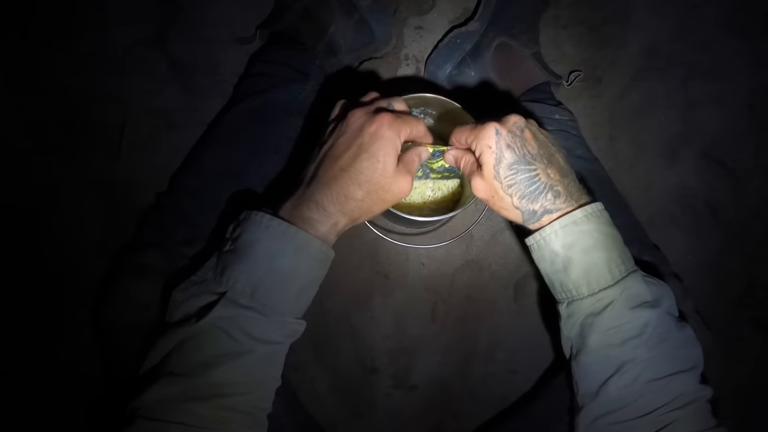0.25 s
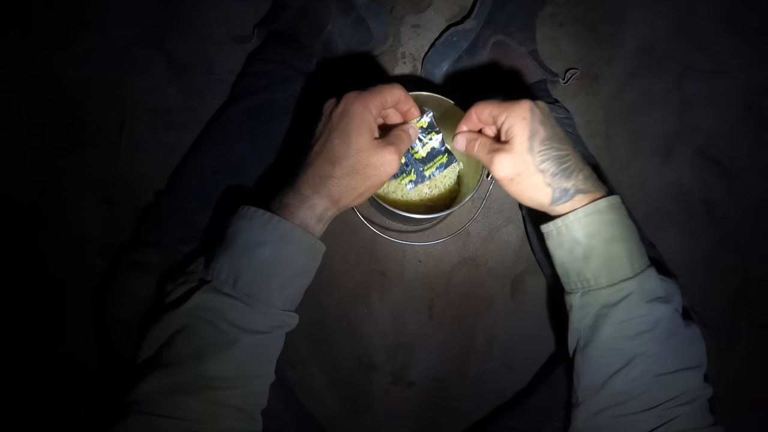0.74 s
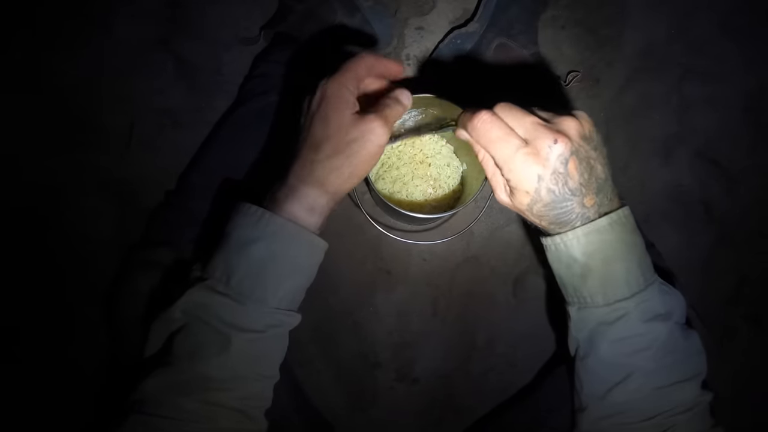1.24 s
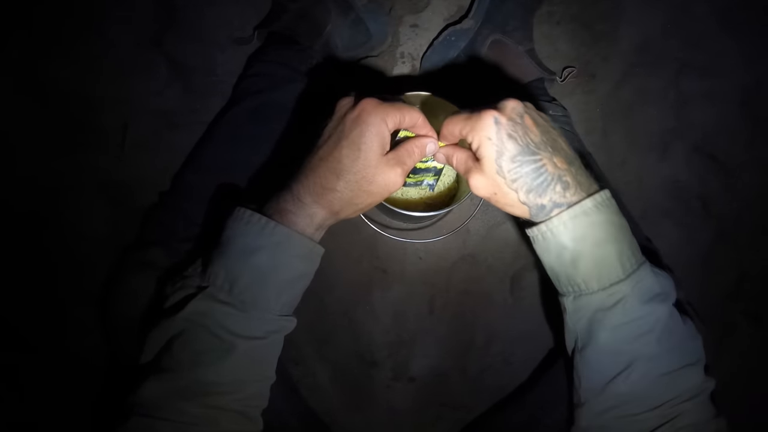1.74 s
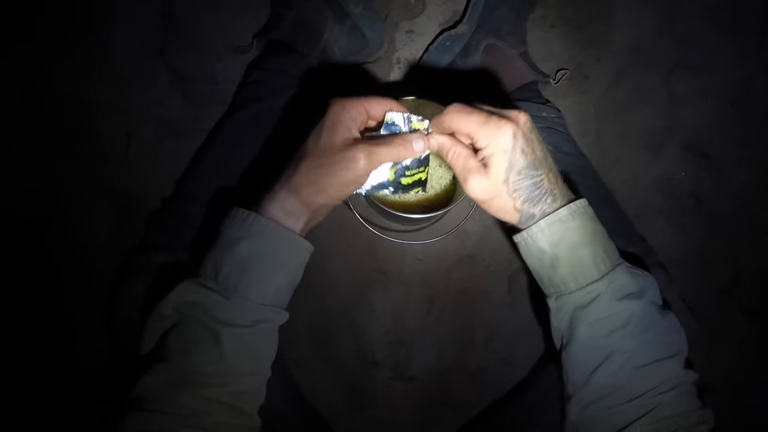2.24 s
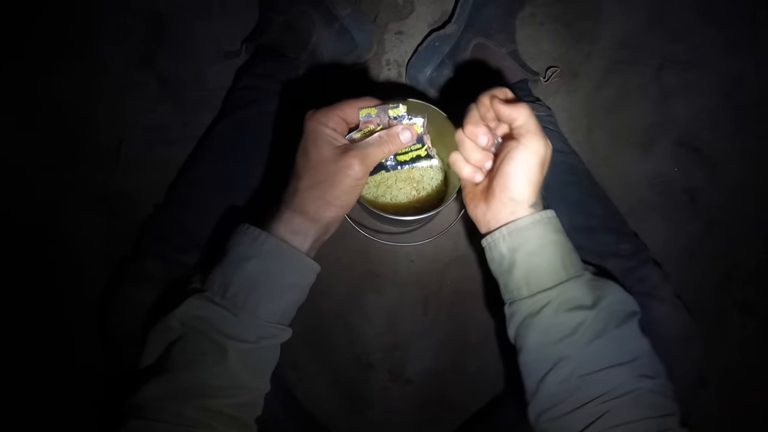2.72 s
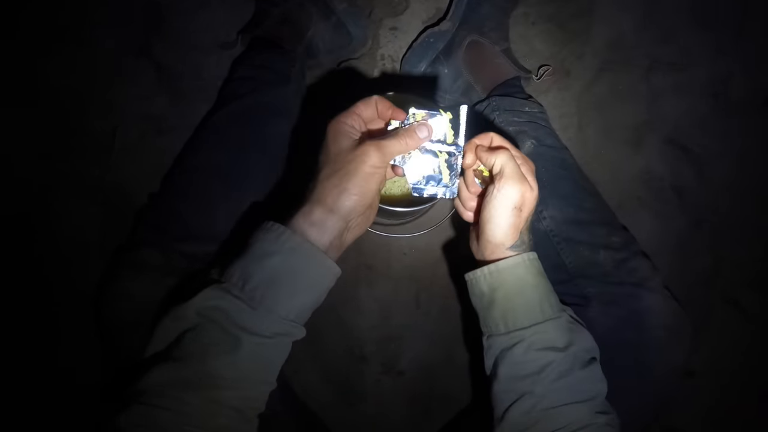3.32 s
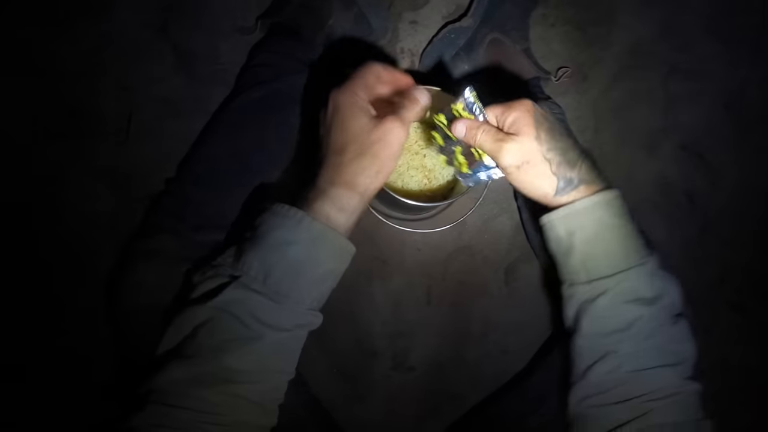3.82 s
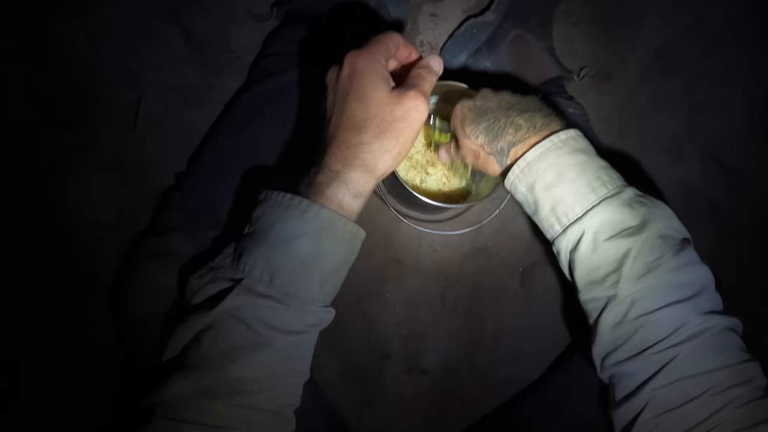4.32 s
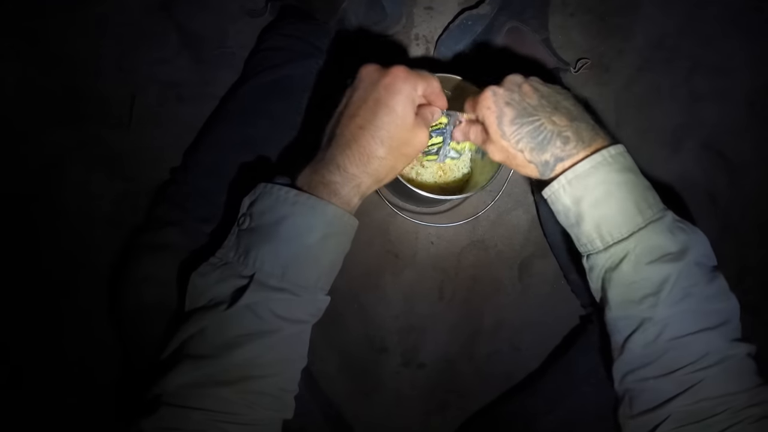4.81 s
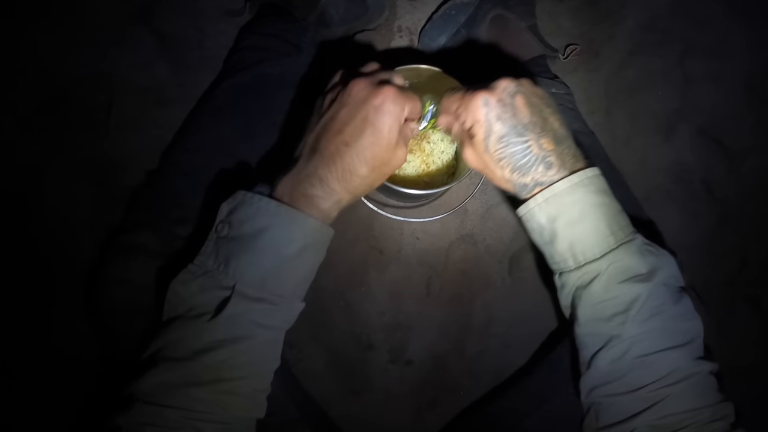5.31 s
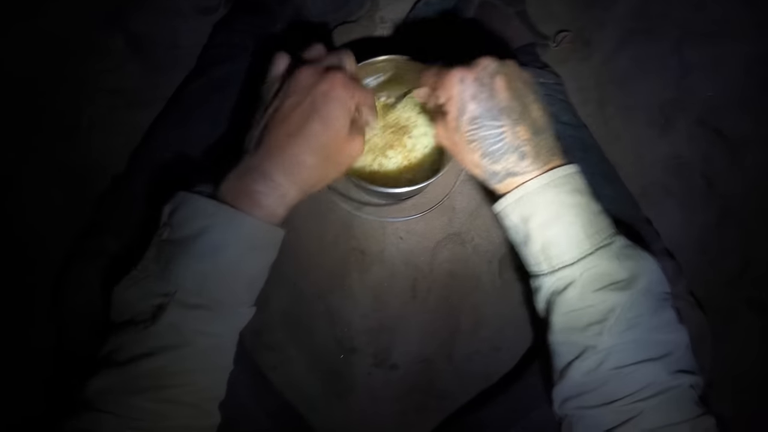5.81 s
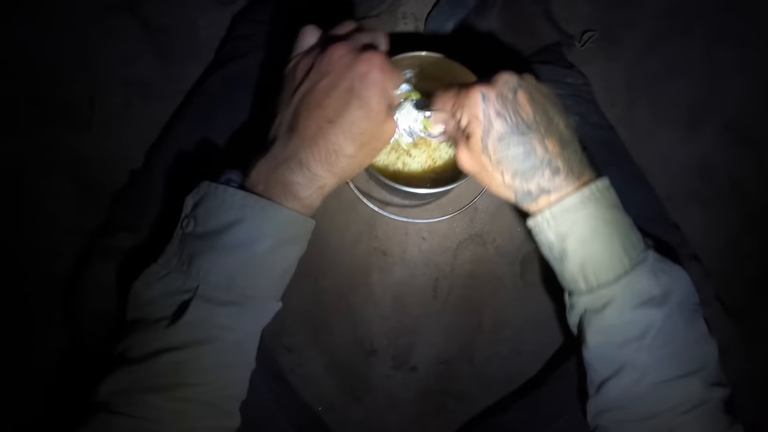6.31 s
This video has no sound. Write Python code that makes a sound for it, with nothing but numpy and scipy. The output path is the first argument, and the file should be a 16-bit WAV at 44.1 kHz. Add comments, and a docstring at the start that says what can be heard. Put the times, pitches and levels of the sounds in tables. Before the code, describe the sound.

Two hands work small foil sachets above a metal pot of noodles, heard close from a head-worn microphone. Sharp creases snap over fine crackle, become crowded with soft hollow pot thumps, then thin out to a quiet moment with a faint metallic rub. The crinkling returns and grows, loudest at the end. A faint low murmur and cloth rumble lie underneath, in a fairly dry, quiet place.

```python
"""Two hands crinkle, tear and empty foil sachets over a metal pot of noodles, close below a head-worn camera.
First, foil creases snap as short volleys of noise through a resonant patch, over a crackle of many tiny ones.
The creases crowd from 2 s, with decaying-sine thumps of the pot's air, and thin out near 4 s, where rubs ring
the wall's modes. From 4.8 s they return, loudest towards the end. Band-passed noise makes the faint low murmur,
the cloth rumbling on the camera throughout, and the knocks on its body near 0.9 s and, very faintly, 4.2 s."""
import sys
import numpy as np
from scipy import signal
from scipy.fft import rfft, irfft
from scipy.io import wavfile
from scipy.ndimage import uniform_filter1d

SR = 44100
rng = np.random.default_rng(int(sys.argv[2]) if len(sys.argv) > 2 else 0)


def unload_audio(sound):
    """Save the sound as a 16-bit wav file, at the path given as the first command line argument."""
    columns = np.transpose(np.atleast_2d(sound))
    # keep every value between -1 and 1, then stretch to whole-number steps
    steps = np.round(np.clip(columns, -1, 1) * 32767)
    wavfile.write(sys.argv[1], SR, steps.astype(np.int16))


N = 288855


def gain_of(db):
    """Amplitude factor for a level in dB."""
    return 10 ** (np.asarray(db) / 20)


def evened(x):
    """Scale each row to an RMS of 1."""
    return x / np.sqrt(np.mean(x ** 2, -1, keepdims=True) + 1e-20)


def read(points, hz):
    """Read a (frequency, value) table along a logarithmic frequency axis."""
    f, value = np.transpose(points)
    return np.interp(np.log(hz + 1), np.log(f + 1), value)


def curves(table):
    """Draw each column of a timed table as a line over the whole scene."""
    s, *columns = np.transpose(table)
    return [np.interp(np.arange(N) / SR, s, column) for column in columns]


def add(mix, s, sound):
    """Mix a sound in at a time in seconds, cut off at the end of the scene."""
    part = mix[..., max(round(s * SR), 0):][..., :sound.shape[-1]]
    part += sound[..., :part.shape[-1]]


def causal(db):
    """Minimum-phase spectrum for a gain in dB, by folding its cepstrum."""
    ceps = irfft(np.maximum(db, -100) * np.log(10) / 20)
    half = ceps.shape[-1] // 2
    ceps[..., 1:half] *= 2
    ceps[..., half + 1:] = 0
    return np.exp(rfft(ceps))


def band(x, lo_hz, hi_hz):
    """Band-pass filter."""
    return signal.sosfilt(signal.butter(2, [lo_hz, hi_hz], "bandpass", fs=SR, output="sos"), x)


def background():
    """A low murmur and the rumble and thudding of cloth: filtered noise, nearly alike in both microphones."""
    # low murmur: (time [s], level [dB])
    murmur_levels = [(0, -54), (.15, -58), (.9, -57), (1.4, -58.5), (1.95, -67), (2.15, -61.5), (3.4, -63),
                     (4.2, -63), (4.3, -63.5), (5.0, -62), (5.8, -55.5), (6.55, -55)]
    # cloth drags on the camera: (time [s], length [s], deep rumble [dB], thudding [dB])
    drags = [(0, 0.18, -67, -73), (0.187, 0.24, -63, -59), (0.834, .13, -55, -56), (1.0, 0.86, -83, -74),
             (2.08, .1, -72, -66), (4.24, .08, -55, -66), (4.26, 0.64, -55.5, -87), (5.2, 0.64, -70, -88),
             (5.734, 0.11, -61, -78), (6.096, 0.36, -61, -73)]
    rest_rumble_db, rest_thud_db = -76.5, -89  # cloth at rest
    murmur_db, = curves(murmur_levels)
    cloth = np.ones((2, N)) * gain_of([[rest_rumble_db], [rest_thud_db]])
    for s, length_s, *db in drags:
        swell = signal.windows.tukey(round(length_s * SR), 0.4)
        add(cloth, s, gain_of(db)[:, None] * swell)
    rumble_gain, thud_gain = cloth
    shared, own = rng.standard_normal((3, 1, N)), rng.standard_normal((3, 2, N))
    murmur, thud, rumble = shared + np.reshape([.2, .2, .35], (3, 1, 1)) * own
    return (gain_of(murmur_db) * evened(band(murmur, 122, 332))
            + thud_gain * evened(band(band(thud, 40, 133), 39, 67))
            + rumble_gain * evened(band(band(rumble, 9.5, 44), 6.3, 44)))


def jolts():
    """Dull knocks carried through the camera body: decaying low noise."""
    # knocks on the camera body: (time [s], peak [dB], t60 [s])
    knocks = [(0.884, -34, 0.14), (4.249, -65, .08)]
    out, t = np.zeros(N), np.arange(SR // 5) / SR
    for s, db, t60 in knocks:
        knock = band(rng.standard_normal(len(t)), 31, 410) * gain_of(-60 * t / t60)
        add(out, s, gain_of(db) * knock / abs(knock).max())
    return out


def surrounds(x, wet_db=-15):
    """A few early echoes, and a short sparse tail that differs left and right and dies sooner in the treble."""
    # early echoes off pot, noodles and ground: (delay [ms], level [dB])
    echoes = [(1.6, -48), (3.1, -28.5), (4.6, -34), (6.5, -30)]
    # decay of the tail: (frequency [Hz], t60 [s])
    decay = [(300, 0.28), (1500, 0.29), (4000, 0.12), (10000, 0.062)]
    size, slot = SR // 5, 20  # samples; each slot holds one reflection of random sign
    starts = np.arange(60, size - slot, slot)
    at = starts + rng.integers(0, slot, (2, len(starts)))
    taps = np.zeros((2, size))
    np.put_along_axis(taps, at, rng.choice([-1., 1.], at.shape), 1)
    hz, t, z = signal.stft(taps, SR, nperseg=128)
    fade = gain_of(-60 * t / read(decay, hz)[:, None])
    tail = signal.istft(z * fade, SR, nperseg=128)[1][:, :size]
    tail *= gain_of(wet_db) / np.linalg.norm(tail[0])
    tail[:, 0] = 1  # the direct sound
    for ms, db in echoes:
        tail[:, round(ms * SR / 1000)] += gain_of(db)
    return signal.fftconvolve(x, tail, axes=1)[:, :N]


def pot_air():
    """Soft thumps of the air inside the pot: decaying sines under a gentle attack."""
    # pushes on the air: (time [s], level of the main tone [dB] before its rise and decay, frequency [Hz])
    thumps = [(0.241, -51, 225), (0.695, -43, 183), (0.881, -47, 280), (1.303, -42, 220), (2.047, -51, 328),
              (2.114, -35, 177), (2.393, -40, 223), (2.503, -53, 301), (2.993, -46, 183), (3.044, -41, 188),
              (3.796, -41, 410), (4.254, -48, 146), (4.804, -44, 204), (4.886, -47, 376), (5.061, -48, 226),
              (5.179, -47, 152), (5.292, -37, 220), (5.381, -43, 220), (5.503, -38, 225), (5.613, -44, 180),
              (5.725, -37, 203), (5.803, -33, 207), (5.865, -43, 214), (6.266, -36, 222), (6.341, -40, 376),
              (6.454, -36, 261)]
    t60_at_40_s, longer_per_db, rise_s = 0.1, 1.06, 0.0033  # t60 of a -40 dB push; harder ones last longer
    out, t = np.zeros(N), np.arange(SR // 3) / SR
    rise = 1 - np.exp(-(t / rise_s) ** 2)
    # higher air modes: (frequency [Hz], level against the main tone [dB])
    overtones = sum(gain_of(g - 60 * t / 0.094) * np.sin(2 * np.pi * f * t) for f, g in [(550, 0.5), (660, -12)])
    for s, db, hz in thumps:
        t60 = t60_at_40_s * longer_per_db ** (db + 40)
        add(out, s, gain_of(db - 60 * t / t60) * rise * (np.sin(2 * np.pi * hz * t) + overtones))
    return out


def pot_wall():
    """The pot's wall set ringing by a short rub: spiky noise drives clusters of decaying modes."""
    # pot wall modes: (frequency [Hz], relative level [dB], t60 [s])
    modes = [(1350, -5.5, 0.6), (2130, 6.5, 0.45), (2760, -21, .07), (3230, 13, 0.18), (4940, 22, 0.038),
             (5500, -3, 0.025)]
    # sachet drags on the wall: (time [s], length of the rub [ms], level of rub and ring [dB])
    rubs = [(4.15, 180, -53.5), (4.398, 35, -54)]
    out, t = np.zeros(N), np.arange(SR // 3) / SR
    wall = np.zeros(len(t))
    for f, g, t60 in modes:
        for split in 1 + .032 * rng.standard_normal(9):  # the dented wall splits each mode into a cluster
            wall += gain_of(g - 60 * t / t60) * np.sin(2 * np.pi * f * split * t)
    for s, ms, db in rubs:
        rub = rng.standard_normal(round(ms * SR / 1000)) ** 3
        add(out, s, gain_of(db) * evened(np.convolve(rub, wall)))
    return out


def creases(pitch_hz, low_db, top_db, ms, peak_db, lumps_db):
    """One left-right pair a crease: a quick volley of tiny buckles rings a patch of foil."""
    # foil heard above the pot: (frequency [Hz], relative level [dB])
    foil = [(180, -27.5), (300, -14.5), (469, -12), (535, -4), (757, -16), (1040, -4), (1570, -7.5),
            (1910, -2.5), (2290, -4.5), (2750, -1.5), (3090, -4), (5890, 0), (9990, -5.5), (13200, -21),
            (15600, -29.5)]
    # hollow of the sachet and hands: (frequency [Hz], width [Hz], boost [dB])
    pouch = [(1937, 84, 2.5), (2120, 64, 3), (4550, 400, 1.5), (8260, 1500, 2.5)]
    t, hz = np.arange(1024) / SR, np.fft.rfftfreq(1024, 1 / SR)
    pitch_hz, low_db, top_db, ms = (np.reshape(c, (-1, 1)) for c in (pitch_hz, low_db, top_db, ms))
    count = len(ms)

    attack = 1 - np.exp(-t / 0.000067)
    decay = np.exp(-(1000 * t / np.maximum(ms, .1)) ** 1.38)
    volley = rng.standard_normal((count, len(t))) * decay * attack

    octaves = np.log2((hz + 1) / pitch_hz)
    db = read(foil, hz) + peak_db * np.exp(-(octaves / 0.24) ** 2)
    # a patch radiates less away from its pitch
    db = db - 3.43 * np.clip(-octaves, 0, 3) - 2.8 * np.maximum(octaves, 0)
    db = db + low_db / (1 + (hz / 1600) ** 4) + top_db / (1 + (5500 / (hz + 1)) ** 4)
    # each patch has its own modes
    lumps = uniform_filter1d(rng.standard_normal((count, len(hz))), size=12)
    db = db + lumps_db * evened(lumps)
    db = db + sum(g / (1 + (2 * (hz - f) / width) ** 2) for f, width, g in pouch)

    # partly flatten the wide-band buckles, so that the foil gives the colour
    spectrum = rfft(volley)
    spectrum /= uniform_filter1d(abs(spectrum), size=16) ** 0.63
    # each crease sits a little left or right, in level and, independently, in time
    lean_db = 0.89 * rng.standard_normal((count, 1))
    lead_samples = 0.094 * rng.standard_normal((count, 1))
    lean = gain_of(lean_db) * np.exp(2j * np.pi * hz * lead_samples / SR)
    late = np.exp(-2j * np.pi * hz * 4 / SR)  # 4 samples of delay
    patch = spectrum * causal(db) * late
    return irfft(patch[:, None] * np.stack([lean, 1 / lean], axis=1))


def crackle(per_s=2200, spread_db=3.5):
    """Many small creases at random, a few much larger than the rest, flaring as folds give way."""
    # how hard the fingers work the foil: (time [s], level before colour [dB])
    work = [(0.0, -46), (0.58, -56.5), (0.77, -50), (0.91, -63), (1.17, -45), (1.29, -49.5), (1.62, -59),
            (1.95, -50.5), (2.11, -42.5), (2.26, -48.5), (2.57, -45.5), (2.79, -49.5), (3.26, -50.5),
            (3.43, -56.5), (3.68, -59), (3.89, -48), (4.16, -49), (4.29, -64), (4.52, -62), (4.8, -60.5),
            (4.98, -50), (5.82, -37.5), (5.97, -38), (6.22, -42.5), (6.38, -47.5), (6.55, -22.5)]
    # colour as the sachets move over the pot: (time [s], low end [dB], top end [dB])
    colour = [(0, 10, -6), (1.0, 9.5, -5.5), (2.1, 5.5, -6), (2.3, -3.5, -6.5), (2.95, 6.5, -6.5),
              (3.4, 0.5, -8.5), (4.0, 6.5, -2.5), (4.4, 3.5, -2), (5.0, 6.5, -5), (5.8, 6.5, -2),
              (6.55, 0.5, -2)]
    # short level changes, nearly all dips as the fingers let go: (time [s], length [ms], change [dB])
    pauses = [(.98, 200, -5.5), (1.57, 79, 0.5), (2.188, 81, -13), (3.1, 45, -3.5), (5.35, 25, -3.5),
              (5.459, 20, -2.5), (5.736, 21.5, -12), (5.82, 19, -15), (6.063, 74, -8.5), (6.47, 27, -21)]
    # a fold gives way and the crackle flares: (time [s], length before stretching [ms], added level [dB])
    flurries = [(0.115, 22, -44), (0.156, 20, -47), (0.233, 12, -35.5), (0.276, 21, -47), (0.36, 14, -41),
                (0.41, 7.7, -39.5), (0.433, 19, -39), (0.461, 31, -48.5), (0.56, 7.8, -39.5),
                (0.641, 6.7, -39), (0.659, 12, -48), (0.739, 50, -41), (0.817, 14, -66), (0.884, 9.6, -51),
                (0.959, 10, -47), (1.1, 16, -48.5), (1.23, 19, -39.5), (1.288, 53, -39), (1.435, 38, -42.5),
                (1.645, 44, -44.5), (1.726, 17, -49), (1.771, 26, -48.5), (1.812, 12, -46),
                (1.842, 26, -38), (1.954, 16.6, -40), (2.015, 51, -48), (2.113, 2.9, -37), (2.265, 67, -41),
                (2.338, 16, -39.5), (2.388, 76, -36), (2.486, 23, -33.5), (2.586, 12, -41),
                (2.621, 66, -41.5), (2.7, 54, -40), (2.83, 20, -49), (2.889, 15, -40.5), (2.959, 64, -37),
                (3.052, 34, -46), (3.154, 12, -60), (3.206, 16, -57), (3.276, 10, -41), (3.323, 15, -40),
                (3.35, 53, -46), (3.519, 10, -61), (3.561, 16, -68), (3.63, 15, -59), (3.791, 42, -34),
                (3.895, 13, -45), (3.966, 71, -44.5), (4.152, 73, -43.5), (4.245, 25, -43),
                (4.288, 45, -41.5), (4.353, 22, -51), (4.401, 16.2, -40), (4.565, 24, -52), (4.76, 12, -56),
                (4.808, 17.5, -29), (4.839, 55, -37), (4.942, 16, -39), (5.014, 24, -38.5),
                (5.066, 34, -35), (5.14, 17, -47), (5.184, 39, -37), (5.234, 8.7, -38.5),
                (5.255, 25, -41.5), (5.289, 29, -30.5), (5.376, 28, -34.5), (5.329, 20, -33),
                (5.439, 14, -39), (5.523, 13, -35), (5.499, 17.7, -25.5), (5.568, 32, -34.5),
                (5.608, 36, -31.5), (5.692, 7.1, -29), (5.721, 14.4, -28), (5.76, 9.8, -39),
                (5.782, 36.4, -30.5), (5.857, 24, -26), (5.898, 50, -30), (5.969, 14, -34.5),
                (6.025, 9.6, -27.5), (6.103, 17, -44.5), (6.174, 54, -28.5), (6.214, 33, -30),
                (6.262, 25.7, -24), (6.327, 140, -29), (6.455, 9.1, -22)]
    (level_db,), (low_db, top_db) = curves(work), curves(colour)
    for s, ms, db in pauses:
        add(level_db, s, db * signal.windows.tukey(round(ms * SR / 1000), 0.3))
    power = gain_of(level_db) ** 2
    for s, ms, db in flurries:
        # stretched, and begun early, to make room for the soft edges
        swell = signal.windows.tukey(round(1.53 * ms * SR / 1000), 0.68)
        add(power, s - 0.32 * ms / 1000, gain_of(db) ** 2 * swell)

    count = 32  # different crease sounds to draw from
    shapes = creases(np.geomspace(1500, 8000, count), np.zeros(count), np.zeros(count),
                     rng.uniform(0.11, 1.0, count), peak_db=4.0, lumps_db=3)
    shapes /= np.std(shapes, axis=(1, 2), keepdims=True)
    happens = rng.random(N) < per_s / SR
    size = gain_of(spread_db * np.minimum(rng.exponential(1, N), 4)) * happens
    size = evened(size) * np.sqrt(power / shapes.shape[-1])
    which, out = rng.integers(0, count, N), np.zeros((2, N))
    for k, shape in enumerate(shapes):
        out += signal.oaconvolve((size * (which == k))[None], shape, axes=1)[:, :N]

    low, top = band(out, 89, 1516), band(out, 3280, 15500)
    return out + (gain_of(low_db) - 1) * low + (gain_of(top_db) - 1) * top


def snaps():
    """The loud creases, one by one: smaller, brighter patches tend to let go quicker."""
    # loudest creases: (time [s], dry peak of the left-right mean [dB], pitch of the foil patch [Hz],
    # low end [dB], top end [dB])
    loud_creases = [(0.1311, -23.5, 3919.0, -1.2, 15), (0.2142, -23.5, 5500, 22, 3.5),
                    (0.2858, -26, 5426.0, 20.5, -5), (0.3554, -26, 5512.0, 6, 3),
                    (0.3634, -22, 5200, 7, -4), (0.387, -34, 1937.0, 11, -5), (0.4084, -24, 2500, -6, 8),
                    (0.4656, -24, 6158.0, 5.7, -12), (0.5068, -27.5, 1230, 9.5, 5),
                    (0.546, -31.5, 3703.0, 18, -1), (0.5574, -30, 5211.0, 5.7, 5.9),
                    (0.561, -20.5, 3789.0, 2, 7), (0.5899, -23.5, 1910, -6, 3), (0.61, -25, 8450, 26, 10),
                    (0.646, -41, 2340, 4.3, -11), (0.6618, -28.5, 1894.0, -2, -9),
                    (0.6727, -27, 5470, -3, -9), (0.7147, -19, 4565.0, 19, 5),
                    (0.7709, -22.4, 5857.0, -4, -2), (0.8264, -30, 1760, 1, -5.5),
                    (0.9042, -28, 4720, 12, -11), (0.9298, -28, 3630, 0, -19),
                    (0.934, -17.5, 1720, 0.5, -7.5), (0.9613, -27, 1720, 7, -14),
                    (0.9675, -36.5, 1780, -3, -4), (1.1288, -28.5, 5540, 4, -4), (1.2139, -29, 3080, 7, -4),
                    (1.2314, -26, 4177.0, -0.4, 13), (1.2392, -20.9, 4380, 13, 6),
                    (1.2895, -18.5, 7900, 5.3, -9), (1.3052, -22.5, 2120, -5, 1.5),
                    (1.3305, -27, 1464.0, 11, 13), (1.4512, -26.0, 4700, 4, -2),
                    (1.5223, -31, 4050, -1.1, -11), (1.5724, -33, 5900, -3, -20),
                    (1.6471, -28, 3130, 5.2, -10), (1.6506, -23.5, 2110.0, -10, -1),
                    (1.6966, -29, 4435.0, 17, 1), (1.7276, -33.9, 4737.0, 7, -2.6),
                    (1.7371, -29.5, 5250, -2.8, -6), (1.7766, -31, 4694.0, 13, -9),
                    (1.7802, -26, 4600, 10, -13), (1.8116, -23.5, 2260, 1, -2.7),
                    (1.8335, -24, 4900, 6, -3), (1.8509, -23, 2170, 16, 4), (1.855, -15.5, 8700, -10, -3),
                    (1.93, -33.5, 2239.0, -8.4, -6.7), (1.9583, -31, 4620, -3, -3),
                    (2.021, -22.5, 5469.0, 7, 5), (2.03, -23.5, 4823.0, 7.5, -5.5),
                    (2.0606, -21, 5500, 8, -6), (2.0957, -22.4, 2600, 13.5, 0), (2.1141, -18, 1960, 7, -10),
                    (2.1177, -17.5, 1808.0, 16, 7), (2.1419, -22.4, 2067.0, -1.2, -5),
                    (2.176, -32, 4220.0, 11, -20), (2.25, -35, 6373.0, 2.9, 8.1),
                    (2.259, -27.9, 5426.0, -5, 9), (2.2699, -20, 2720, 7, 6), (2.2875, -26.5, 2500, 9, 8),
                    (2.3163, -24.5, 2000, 0, -12), (2.357, -22.5, 1894.0, 1, -8),
                    (2.3927, -17.5, 1830, 6, -3), (2.3969, -17, 5986.0, -6, 1),
                    (2.4249, -16, 2150, 7.5, -6), (2.459, -14.5, 1990, -8, -16),
                    (2.4674, -29, 4306.0, 6, -16), (2.4823, -24, 8182.0, -1, 7.9),
                    (2.4878, -20.5, 4392.0, -14, 7), (2.5034, -15.5, 4370, 7, -10),
                    (2.5084, -25, 2799.0, 10, -3.6), (2.5342, -22, 2880, -9, -11),
                    (2.5493, -24.5, 4000, 3, 1.3), (2.5965, -27, 2239.0, -2, 13),
                    (2.6076, -31, 5254.0, -12, 12), (2.629, -20.5, 5640, -6, 7),
                    (2.6509, -14, 2000, -25, -8.5), (2.6577, -24.2, 2799.0, -3, 7),
                    (2.664, -25.7, 4521.0, -13, 0), (2.6769, -24, 4091.0, -2, 0),
                    (2.7135, -26, 4240, 3.5, 1), (2.747, -21.5, 1300, 11.5, -3),
                    (2.8309, -15.5, 2370, -8, -7.5), (2.8932, -33, 2799.0, -2, 9),
                    (2.8994, -21, 4470, 6, 9), (2.957, -22.5, 5900.0, 18, 8),
                    (2.9678, -14.5, 5943.0, 7.5, -14), (2.9889, -15, 5770.0, -1.8, 0),
                    (3.0534, -25, 4048.0, -9, -12), (3.083, -31.5, 2740, 3.9, -14),
                    (3.0949, -34, 4600, 15, -9), (3.1609, -36.5, 2153.0, -5.6, -15),
                    (3.1704, -24.5, 4600, -19, -6), (3.211, -28.7, 4240, -13, 1),
                    (3.2166, -24.5, 2368.0, -29, -5), (3.2852, -14.5, 3120, -24, -6),
                    (3.3289, -16.5, 4909.0, 11, 0), (3.3498, -21.5, 3150, -25, -18),
                    (3.3574, -20.5, 3240, -15, -14.5), (3.3767, -22.5, 4450, 6.5, -4),
                    (3.3973, -25, 5986.0, 11, -7), (3.4212, -29.5, 6040, 9, -13),
                    (3.4587, -34.5, 4940, 1.3, -7), (3.5217, -40, 4349.0, 10, -7),
                    (3.5653, -40, 2350, -3.9, -11.4), (3.624, -32.9, 4478.0, -3, -7),
                    (3.633, -24, 2110.0, 2, 3), (3.659, -29.5, 2713.0, 8, 3), (3.672, -39, 2670.0, 0, 1),
                    (3.7427, -37, 4565.0, 3.8, -10.5), (3.7554, -21, 4100, -30, -43),
                    (3.7726, -23, 4177.0, -6, -17), (3.8074, -12, 4770, 12, -6), (3.829, -21, 4600, -7, -1),
                    (3.8473, -22.5, 1140, 7, -3), (3.8585, -21, 4600, -13, -4.3),
                    (3.8734, -25.5, 4048.0, 5.6, -9), (3.9048, -23.5, 5600, 18, -4),
                    (4.152, -28.5, 4694.0, 2, -14), (4.4615, -30.5, 4048.0, -22, -12),
                    (4.7593, -35.7, 4005.0, -5.0, -21), (4.7654, -30, 2067.0, -16, -20),
                    (4.8204, -18.5, 1890, 13, 13), (4.847, -17, 1790, -2, -3), (4.856, -21, 4700, 1, -5.3),
                    (4.8659, -20, 6115.0, 3.3, 23), (4.9293, -33, 4823.0, -1, -2.8),
                    (4.9493, -22.5, 1840, -7, -12), (4.9856, -24, 6287.0, 7, -2),
                    (4.992, -23, 4650, -9.5, -2.9), (5.0452, -22.5, 1960, 9, 2.9),
                    (5.091, -24, 2971.0, 1, 3), (5.1474, -26.5, 5297.0, 3.8, 22),
                    (5.231, -23, 6158.0, 7.7, 34), (5.417, -25.0, 1210, 2, -5),
                    (5.438, -18, 6287.0, -3, 0.2), (5.4438, -16.5, 4700, 12, -2),
                    (5.4556, -18.5, 5060, -1, -7.2), (5.5473, -25, 1937.0, 4, 2),
                    (5.573, -18.5, 1880, 16.5, 14.5), (5.5878, -17, 5512.0, -3, 3),
                    (5.615, -10.5, 5684.0, 6.1, -8), (5.621, -12.5, 5630, -1, 0),
                    (5.6384, -14.5, 5124.0, -1, 3.3), (5.6684, -23, 3789.0, -7, -11),
                    (5.6796, -17, 8441.0, -6, 17), (5.699, -19, 1981.0, 4, -6), (5.72, -20, 5081.0, -2, 15),
                    (5.7604, -19.5, 6072.0, 11, 16), (5.7804, -18.5, 5600, 10, 9),
                    (5.8108, -11.5, 8850, 15, -2), (5.846, -18.4, 4435.0, 0.4, 8),
                    (5.868, -15.3, 4392.0, 1.7, -8), (5.8891, -6.5, 6200, 12, 0),
                    (5.9185, -18.3, 9500, 0, 14), (5.9394, -24, 4400, 7, 11), (5.9838, -16, 6700, 11, -1),
                    (6.0044, -11, 3830, 0, 2.7), (6.0225, -14, 7950, -3, -3),
                    (6.0347, -16.5, 3200, -14, -9), (6.0474, -37, 2713.0, 4, -4.2),
                    (6.06, -20, 5600, -11, 0), (6.0988, -26, 5469.0, 10, -12),
                    (6.1349, -23.5, 5297.0, -11, -16), (6.1846, -10.5, 5641.0, -10, -6),
                    (6.222, -14, 2842.0, -13, -9), (6.2536, -17.5, 1920, 8, 4),
                    (6.2598, -16.5, 1860, -3, -1.7), (6.2642, -12.5, 1800, 2, -5),
                    (6.3113, -11.5, 6115.0, -5, -1), (6.316, -12, 6029.0, -11, 1),
                    (6.3289, -14.5, 3380, 2, -10), (6.3341, -13.3, 4900, -6.0, -10),
                    (6.3394, -9, 5641.0, -13, -4), (6.3512, -11.5, 6000, 11, -7),
                    (6.3571, -7, 5430, 8, -13), (6.3654, -7.5, 2610, -2, -4), (6.3785, -8, 4900, -12, -7),
                    (6.3821, -12.5, 3130, 0, -14), (6.3916, -17, 4263.0, 31, 9),
                    (6.4125, -23, 7967.0, 2.6, -2), (6.4567, -11.3, 7000, 30.5, 0),
                    (6.4645, -15, 4000, -6, -5.1), (6.5087, -14.5, 4263.0, -2.9, -1.8),
                    (6.5473, -13, 6140, -0.7, 12.8)]
    ms_at_4khz, shorter_per_octave, length_spread = 0.82, 0.62, 0.88  # spread in natural-log units
    s, db, hz, low_db, top_db = np.transpose(loud_creases)
    ms = ms_at_4khz * shorter_per_octave ** np.log2(hz / 4000)
    ms = ms * np.exp(length_spread * rng.standard_normal(len(s)))
    sound = creases(hz, low_db, top_db, ms, peak_db=6.0, lumps_db=2.8)
    peak = abs(sound.mean(1)).max(1)
    sound = sound * (gain_of(db) / peak)[:, None, None]
    out = np.zeros((2, N))
    for at, crease in zip(s, sound):
        add(out, at, crease)
    return out


def scene():
    """Foil and pot sound in their surroundings; murmur, cloth and knocks stay dry."""
    foil_and_pot = snaps() + crackle() + pot_air() + pot_wall()
    return surrounds(foil_and_pot) + background() + jolts()


def record(dry):
    """The two microphone ports differ a little in level and phase; then the top is cut off."""
    # level between the ports: (frequency [Hz], left minus right [dB])
    balance = [(60, -1.0), (150, -1.6), (380, -0.84), (950, -1.2), (2380, -1.6), (5980, -1.4),
               (15000, 0.015)]
    # phase between the ports: (frequency [Hz], lead of the left [rad])
    lead = [(0, -0.54), (1550, -0.071), (1890, -0.28), (3270, -0.83), (5770, -0.41), (6980, -0.94),
            (7670, 0.15), (10200, 0.41), (13200, 1), (15300, 1)]
    edge_hz = 15780
    hz = np.fft.rfftfreq(N, 1 / SR)
    half = gain_of(read(balance, hz) / 2) * np.exp(.5j * read(lead, hz))  # half the difference goes to each port
    ports = irfft(rfft(dry) * np.array([half, 1 / half]), N)
    lowpass = signal.firwin(511, edge_hz, window=("kaiser", 9), fs=SR)
    return signal.oaconvolve(ports, lowpass[None], "same")


dry = scene()
out = record(dry)
unload_audio(out)
```